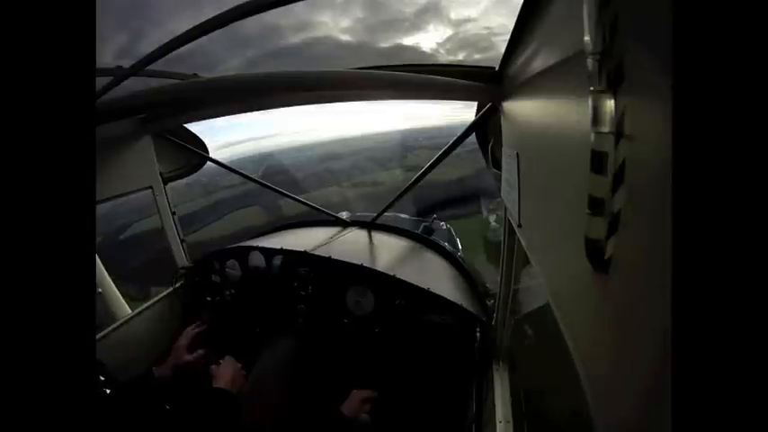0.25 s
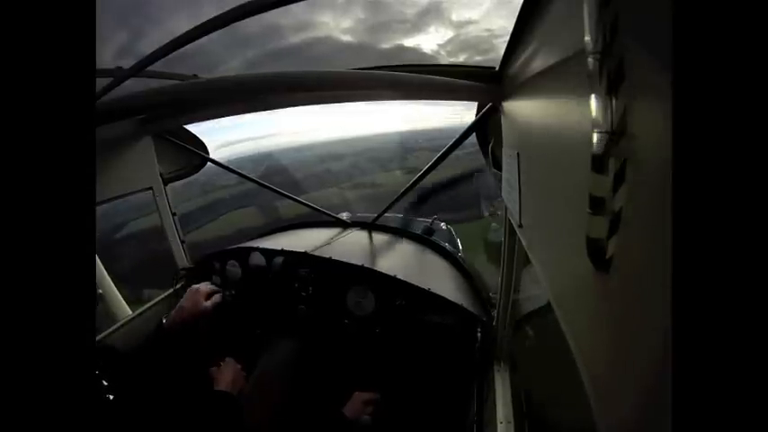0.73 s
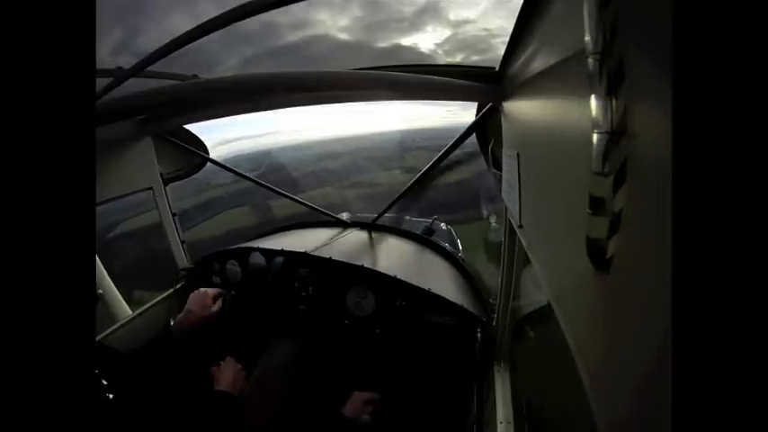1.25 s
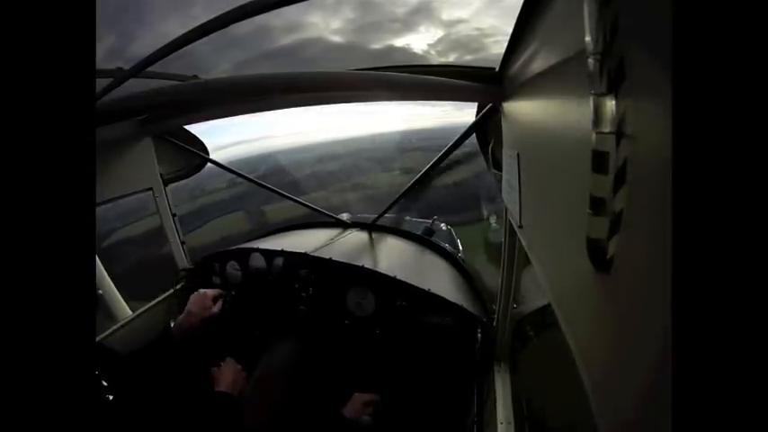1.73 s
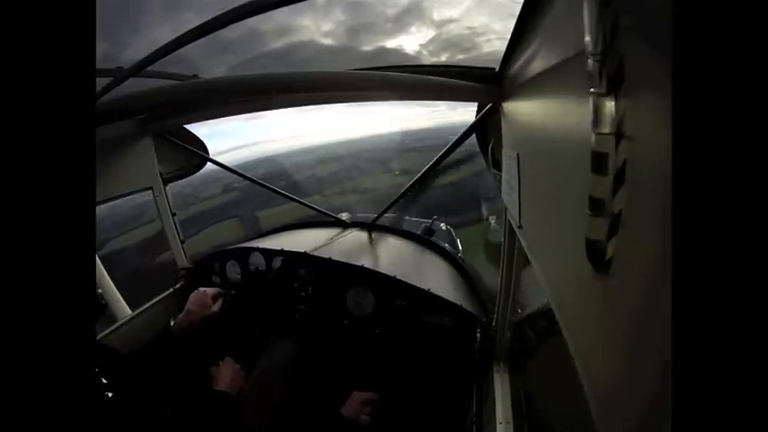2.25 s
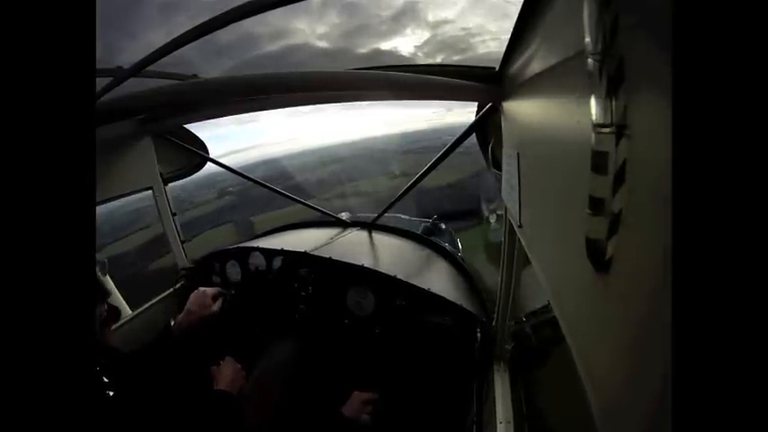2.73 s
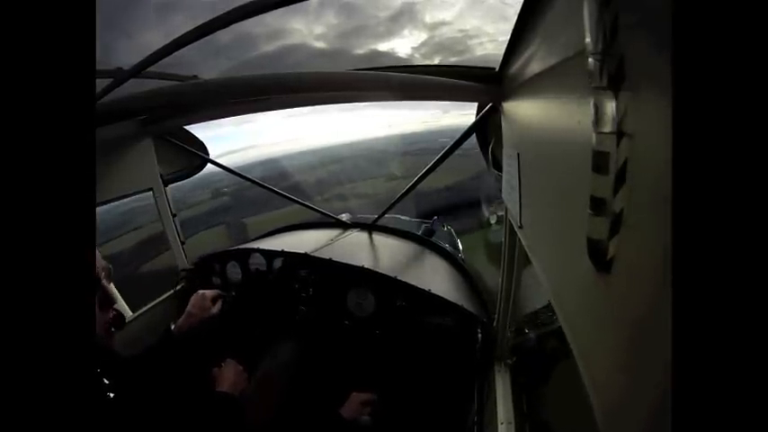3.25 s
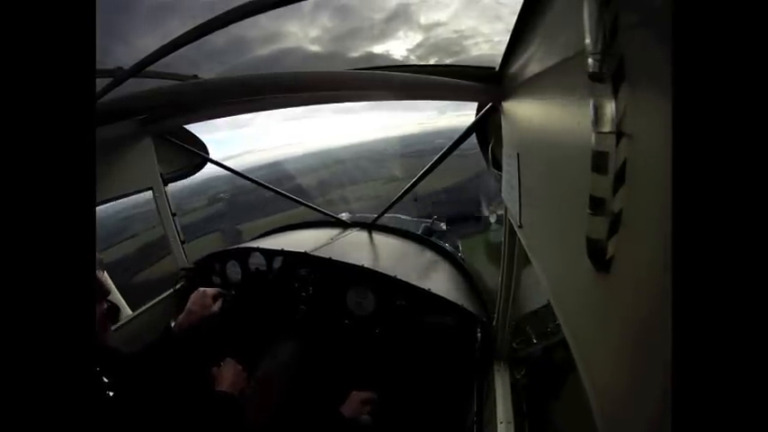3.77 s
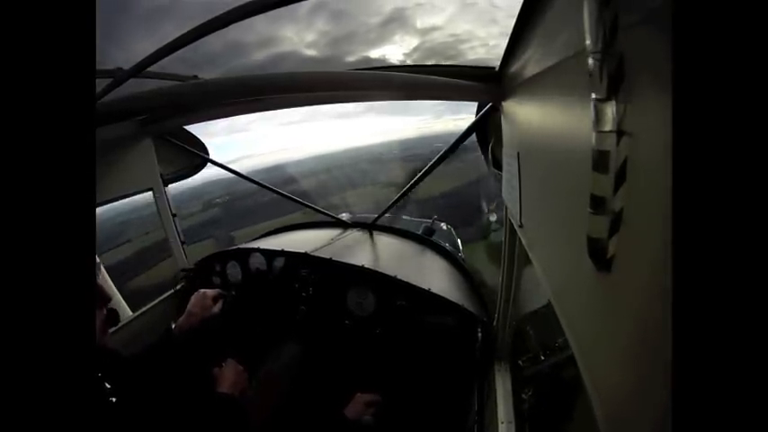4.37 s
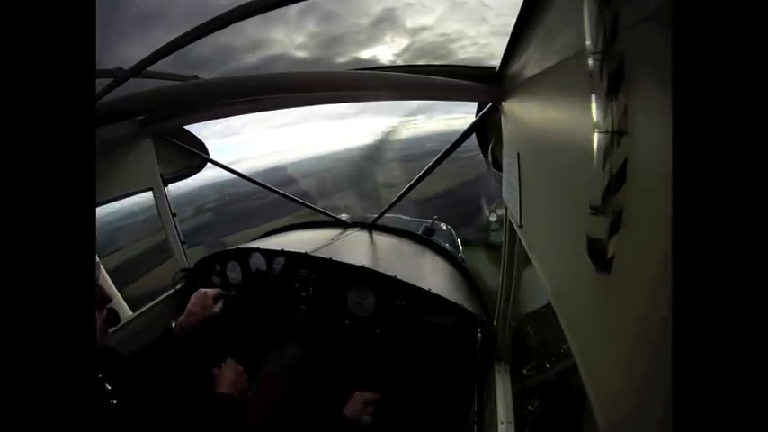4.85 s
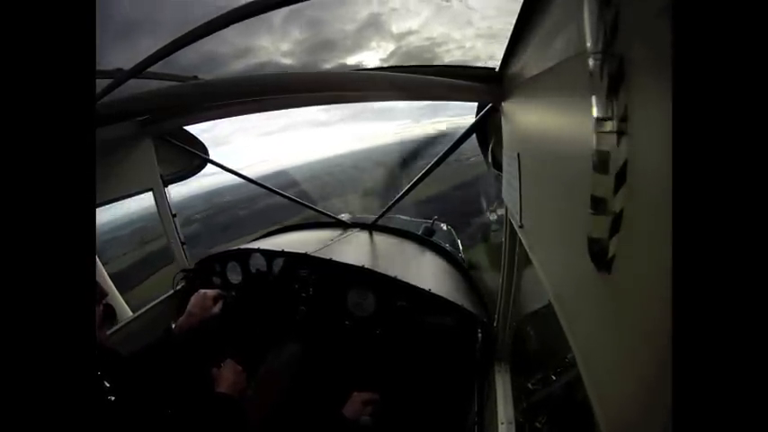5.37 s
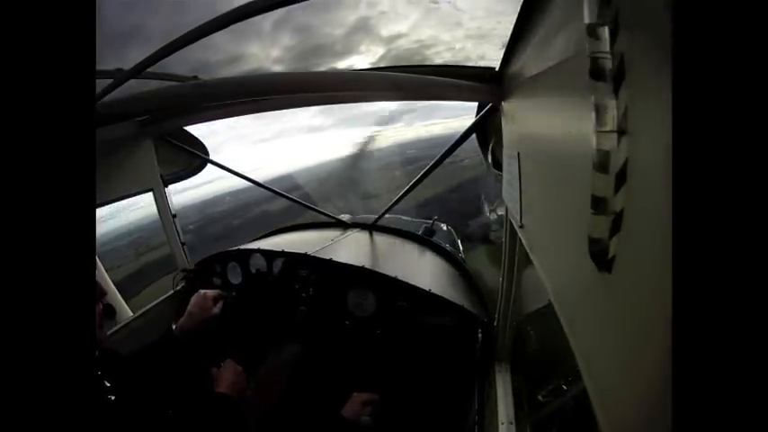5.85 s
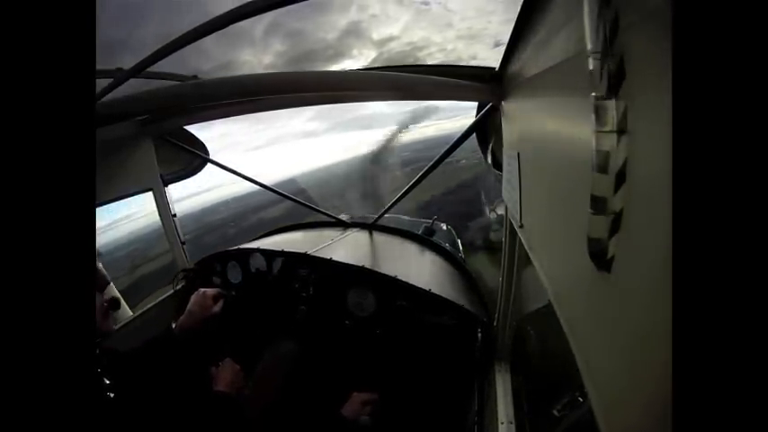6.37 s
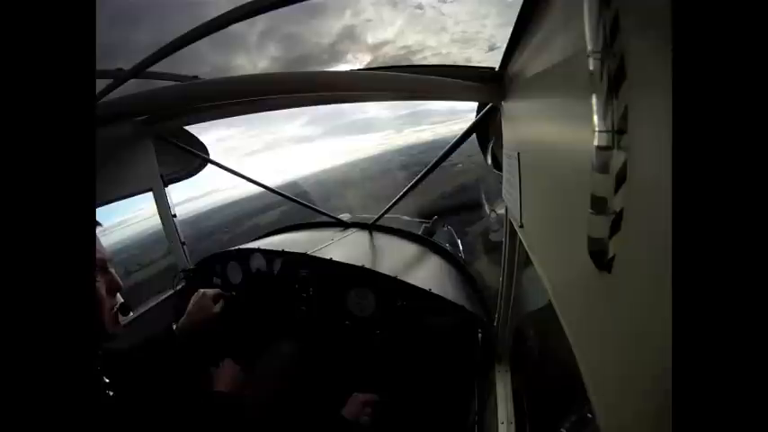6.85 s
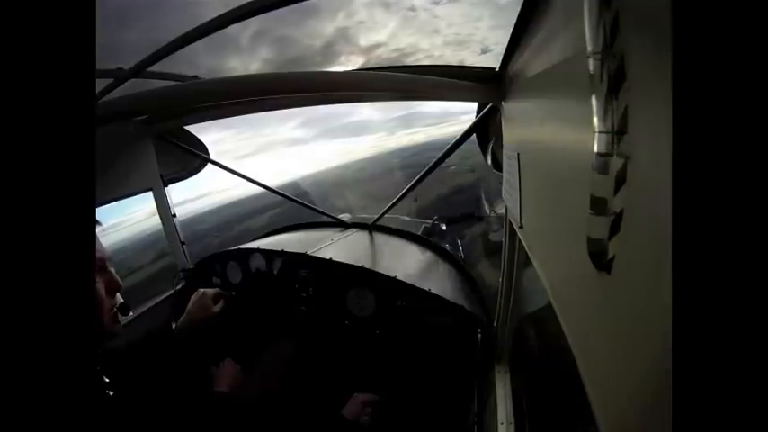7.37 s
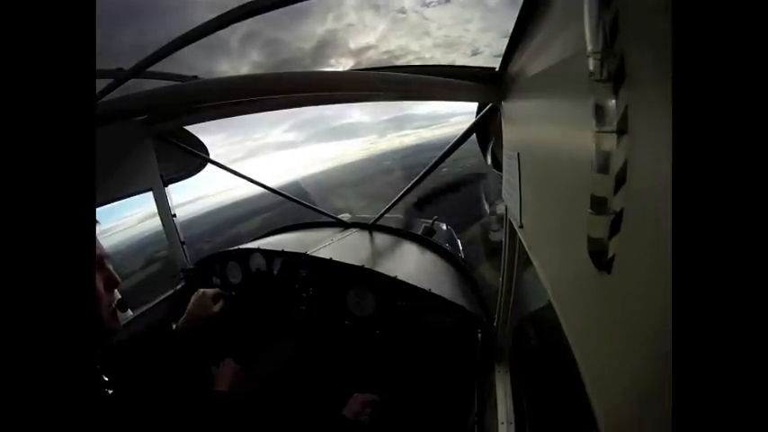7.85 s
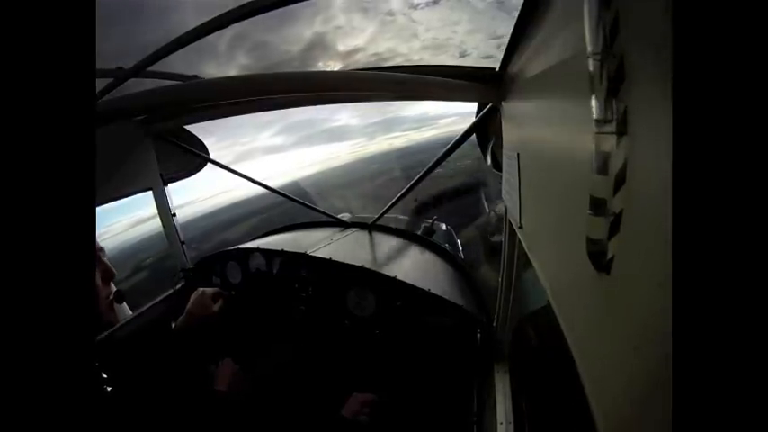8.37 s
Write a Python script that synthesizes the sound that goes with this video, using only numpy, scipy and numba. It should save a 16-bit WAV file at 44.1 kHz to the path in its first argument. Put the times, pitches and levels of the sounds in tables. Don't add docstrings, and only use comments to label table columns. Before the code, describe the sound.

Inside a light aircraft cabin in steady flight, already at full noise from 0 s. A four-cylinder engine and two-blade propeller drone at about 50 pulses per second, deep and slightly lopsided, with quick panel knocks blurring into a buzz. Slipstream buffets low and hisses broadly through the panels, pulsing with the exhaust. A door gap whistles near 2.1 kHz at the start, then hops to two higher notes from about 0.4 to 2 s, and glides gently upward around 2.2 to 2.9 s. Near 3 s the engine speeds up very slightly, its boom swells, and the whistle becomes fainter, flickering on and off among its notes. Boom surges again near 4.7 and 5.8 s, then steadies until the cut at 8.6 s. The small camera's level drifts with brief dips, its compressed sound almost mono, with gritty, mirrored treble.

```python
import sys
import numpy as np
from scipy import signal
from scipy.fft import rfft, irfft, next_fast_len
from scipy.io import wavfile
from scipy.ndimage import uniform_filter1d
from numba import njit

SR = 44100
rng = np.random.default_rng(int(sys.argv[2]) if len(sys.argv) > 2 else 0)


def linear_from_db(decibels):
    return 10 ** (np.asarray(decibels, float) / 20)


def inscribe(sig):
    pcm = np.round(np.clip(np.atleast_2d(sig).T, -1, 1) * 32767)
    wavfile.write(sys.argv[1], SR, pcm.astype(np.int16))


N = 379701
T = np.arange(N) / SR

# frequency in Hz, density in dB per Hz.
RUSH_SPECTRUM = [(180, -38), (300, -4.5), (598, -6.5), (749, -4), (893, -1), (987, -7), (1190, -3),
                 (1420, -7.5), (1990, -4), (2590, -12), (2830, -15), (3680, -17.5), (4070, -21),
                 (5500, -22.5), (6000, -30), (7800, -69), (13200, -120)]
# frequency in Hz, density in dB per Hz.
RUMBLE_SPECTRUM = [(12, -32), (30, -46), (44, -4.5), (62, 3.5), (85, -2), (118, -6.5), (145, -5.5),
                   (180, -4.5), (215, -11.5), (255, -19.5), (300, -21), (450, -39), (600, -60)]
# centre in Hz, width in Hz, peak in dB over the surrounding noise.
PANEL_RESONANCES = [(235, 9.8, 6), (352, 16.5, 3.5), (761, 56, 6), (903.4, 16.7, 8.5), (1183, 64, 2),
                    (1292, 33, 3.5), (1855, 86, 4.5), (2050, 51, 3), (2530, 200, 6.5), (3100, 69, 7.5),
                    (3662, 217, 8.5)]
# lower band edge in Hz, depth in dB, lag in firings,
# levels of the four cylinders in dB.
EXHAUST_PUFFS = [(250, .8, .55, [-.3, -1.2, .3, .8]), (700, 1.3, .45, [0, -.6, 0, .6]),
                 (1450, 1.5, .42, [.2, -.2, -.4, .5]), (2750, 1.6, .45, [-.2, -.3, .1, .7])]
# start in seconds, end in seconds, first Hz, last Hz, level in dB.
LOW_NOTE = [
    (0.03, 0.4, 2127, 2130, -33),
    (1.22, 1.5, 2166, 2169, -37.5),
    (2.2, 2.85, 2157, 2178, -36),
    (2.85, 3.14, 2179, 2188, -41),
    (3.55, 4.24, 2182, 2181, -39),
    (4.85, 5.4, 2180, 2186, -40),
    (6.08, 6.8, 2180, 2187, -39.5),
    (7.15, 8.1, 2182, 2182, -40.5),
    (8.1, 8.7, 2181, 2172, -39),
]
# start in seconds, end in seconds, first Hz, last Hz, level in dB.
MIDDLE_NOTE = [(0.37, 0.58, 2405, 2464, -35.5), (0.58, 0.92, 2462, 2476, -35.5),
               (1.09, 1.18, 2485, 2474, -33), (1.58, 1.77, 2479, 2473, -33),
               (1.85, 2.03, 2463, 2465, -41.5), (2.1, 2.16, 2466, 2465, -38),
               (3.23, 3.45, 2548, 2539, -41.5), (4.52, 4.74, 2513, 2544, -43),
               (5.65, 5.84, 2544, 2536, -37), (5.84, 5.93, 2535, 2528, -44), (6.98, 7.08, 2526, 2537, -46)]
# start in seconds, end in seconds, first Hz, last Hz, level in dB.
HIGH_NOTE = [
    (0.47, 0.8, 2600, 2583, -46),
    (0.9, 0.99, 2572, 2576, -39),
    (0.99, 1.08, 2578, 2603, -34),
    (1.53, 1.61, 2598, 2602, -41),
    (1.8, 1.96, 2592, 2584, -45),
    (3.2, 3.43, 2671, 2659, -41),
    (4.42, 4.49, 2640, 2635, -39),
    (4.67, 4.8, 2654, 2638, -41.5),
    (5.65, 5.71, 2673, 2670, -44),
    (7.02, 7.14, 2660, 2620, -44.5),
]
# frequency in Hz, 60 dB decay time in seconds,
# level in dB over the air noise, lag in firings, levels of the four cylinders in dB.
STRUCK_PANELS = [(763, .06, -13.5, .2, [-14, -20, 0, -10]), (1172, .035, -14.5, .55, [-8, -8, -10, 0]),
                 (2030, .03, -15.5, .3, [0, -8, -16, -3]), (3110, .035, -21, .35, [-7, -7, 0, -2])]
# multiple of the firing rate, level in dB over the air noise.
WEAK_ORDERS = [(.5, -16), (.75, -10.5), (1.5, -12), (1.75, -8), (2.25, -11), (2.75, -15), (3, -5.8),
               (3.5, -16), (4, -10.5), (4.5, -16), (4.75, -23), (5.5, -27), (6, -32)]
# time in seconds, firing rate in Hz.
FIRING_RATE = [(0, 49.7), (.45, 49.72), (1, 50.08), (1.7, 49.85), (2.1, 49.9), (3.5, 50.67), (4.25, 50.88),
               (4.8, 50.74), (5.6, 50.9), (6.3, 50.75), (8.61, 50.73)]
# time in seconds, level in dB.
CABIN_BOOM = [(0, -20.9), (.4, -21.6), (.8, -30), (1, -20), (1.25, -25), (1.75, -22.5), (2.22, -27),
              (2.5, -21), (2.8, -20.5), (3.25, -14.5), (4.25, -19), (4.65, -15.5), (5, -17.7), (5.75, -15),
              (6.25, -17.5), (7, -18), (8.4, -19), (8.61, -19.5)]
# time in seconds, gain in dB.
SLOW_GAIN = [(0, -25.5), (.5, -23.5), (1.45, -24), (1.9, -26.5), (2.15, -24), (2.35, -26.5), (2.65, -24),
             (2.88, -26), (2.97, -28), (3.42, -30), (3.8, -27.5), (5.2, -27), (5.75, -29), (5.9, -31),
             (6.3, -28.5), (7.75, -27), (8.15, -30), (8.6, -27)]
# time in seconds, depth in dB.
GAIN_DUCKS = [(.11, 0.5), (.59, 3.5), (.74, 3.5), (1.28, 2), (1.51, 3.5), (2.02, 4), (2.42, 3), (2.74, 3),
              (3.38, 3), (3.97, 4), (4.3, 3), (4.5, 2), (4.92, 4), (5.4, 0.5), (6.58, 2.5), (6.95, 5.5),
              (7.37, 2.5), (7.57, 3), (7.9, 1)]
# frequency in Hz, density in dB per Hz.
SIDE_SPECTRUM = [(30, 0), (100, -9), (330, -6), (700, -21.5), (2500, -35.5), (7500, -41.0)]


def curves(table):
    seconds, *columns = np.transpose(table)
    return [np.interp(T, seconds, column) for column in columns]


def walk(rate):
    hold = int(SR / rate)
    steps = np.repeat(rng.standard_normal(N // 100)[:N // hold + 1], hold)
    return 1.407 * uniform_filter1d(uniform_filter1d(steps, hold), hold)[:N]


def coloured(spectrum, edges_hz):
    size = next_fast_len(N)
    hz = np.arange(1, size // 2 + 2) * SR / size
    table_hz, table_db = np.transpose(spectrum)
    gain = linear_from_db(np.interp(np.log(hz), np.log(table_hz), table_db, left=-90, right=-90))
    for centre, width, peak_db in PANEL_RESONANCES:
        gain = gain * (1 + (linear_from_db(peak_db) - 1) / (1 + (2 * (hz - centre) / width) ** 2))
    bins = rfft(rng.standard_normal(size)) * gain / np.sqrt(np.mean(gain ** 2))
    return [irfft(bins * (hz >= lo) * (hz < hi), size)[:N] for lo, hi in zip(edges_hz, edges_hz[1:])]


def rush(firings):
    bands = coloured(RUSH_SPECTRUM, [row[0] for row in EXHAUST_PUFFS] + [SR / 2])
    firing_db = 1.14 * rng.standard_normal(N // 500)
    gust_db = .4 * walk(10)
    out = 0
    for band, (_, depth_db, lag, cylinder_db) in zip(bands, EXHAUST_PUFFS):
        phase = firings + 1 - lag
        puff_db = depth_db * (np.exp(1.2 * (np.cos(2 * np.pi * phase) - 1)) - .4)
        puff_db += np.interp(phase % 4, np.arange(5), cylinder_db + cylinder_db[:1])
        puff_db += np.interp(phase, np.arange(len(firing_db)), firing_db)
        out = out + band * linear_from_db(puff_db + gust_db + 0.14 * walk(5.1))
    return out


def rumble(firings):
    bands = coloured(RUMBLE_SPECTRUM, [10, 60, 110, 190, 500])
    throb_db = 1.5 * np.cos(2 * np.pi * (firings - .45))
    return sum(band * linear_from_db(1.4 * walk(4) + throb_db * (k > 1)) for k, band in enumerate(bands))


def whistle(notes):
    attack_s, release_s = .05, .1
    start, end, first_hz, last_hz, level_db = np.transpose(notes)
    flutter_hz = 5 * walk(40)
    flutter_db = 1.6 * walk(50) + .6 * walk(9)
    hz = np.interp(T, np.ravel([start, end], "F"), np.ravel([first_hz, last_hz], "F"))
    envelope = 0
    for a, b, db in zip(start, end, level_db):
        ramps = np.minimum((T - a) / attack_s, (b - T) / release_s)
        envelope = envelope + linear_from_db(db) * np.clip(ramps + .5, 0, 1)
    tone = np.sin(2 * np.pi * np.cumsum(hz + flutter_hz) / SR)
    return np.sqrt(2) * envelope * linear_from_db(flutter_db) * tone


def knocks(firings):
    scatter_db, jitter = 2.5, .02
    count = np.arange(int(firings[-1]) - 1)
    out = 0
    for hz, t60, db, lag, cylinder_db in STRUCK_PANELS:
        late, hard = rng.standard_normal((len(count), 2)).T
        blows = np.zeros(N)
        at = np.searchsorted(firings, count + lag + jitter * late)
        blows[at] = linear_from_db(np.take(cylinder_db, count % 4) + scatter_db * hard)
        pole = np.exp(2j * np.pi * hz / SR - np.log(1000) / (t60 * SR))
        onset = signal.lfilter([1], [1, -pole * abs(pole) ** 2], blows)
        ring = signal.lfilter([1], [1, -pole], onset).imag
        out = out + linear_from_db(db) * ring / ring.std()
    return out


def order(multiple, firings, db):
    quarters = round(4 * multiple)
    lag = rng.random() * (quarters % 4 > 0)
    waver = 0.021 * multiple * walk(2.916)
    return -np.sqrt(2) * linear_from_db(db) * np.sin(2 * np.pi * (quarters / 4 * firings + lag + waver))


def engine(firings, boom_db, lope_db, octave_db, air_db):
    boom_db = boom_db + 0.9 + 1.5 * walk(4.5)
    out = order(1, firings, boom_db) + order(5 / 4, firings, lope_db) + order(2, firings, octave_db)
    for multiple, db in WEAK_ORDERS:
        out = out + order(multiple, firings, air_db + db + 2.9 * walk(3))
    return out


def camera_gain():
    attack_s, release_s = .012, .07
    slow_db = curves(SLOW_GAIN)[0]
    ducks_db = 0
    for seconds, depth_db in GAIN_DUCKS:
        since = T - seconds + attack_s
        rise = np.clip(1 + since / attack_s, 0, 1)
        ducks_db = ducks_db + depth_db * rise * np.exp(-np.maximum(since, 0) / release_s)
    return slow_db, slow_db - ducks_db + .5 * walk(14)


def tracking(level_db, slope, swell_db, slow_db):
    return level_db + slope * (slow_db + 27.5) + swell_db * walk(2.96)


def scene():
    hz, boom_db = curves(FIRING_RATE)[0], curves(CABIN_BOOM)[0]
    firings = -.85 + np.cumsum(hz) / SR
    slow_db, air_db = camera_gain()
    lope_db = tracking(-30.5, 1.9, 1.2, slow_db)
    octave_db = tracking(-28.7, 1.3, 2.6, slow_db)
    mono = linear_from_db(air_db - 1.14) * rush(firings)
    mono += linear_from_db(air_db + 5.5) * rumble(firings)
    mono += linear_from_db(air_db - slow_db + 1.74) * sum(whistle(notes) for notes in (LOW_NOTE, MIDDLE_NOTE, HIGH_NOTE))
    mono += linear_from_db(air_db) * knocks(firings)
    mono += engine(firings, boom_db, lope_db, octave_db, uniform_filter1d(air_db, SR // 4))
    return np.array([mono, mono])


@njit
def follower(x, attack, release):
    out, level = np.empty(len(x)), .3
    for i in range(len(x)):
        level += (abs(x[i]) - level) * (attack if abs(x[i]) > level else release)
        out[i] = level
    return out


def band_limit(x):
    return signal.sosfilt(signal.butter(12, 15720, fs=SR, output="sos"), x)


def record(dry):
    peak = follower(dry[0], 1 / (.003 * SR), 1 / (.12 * SR))
    ducked = dry[0] * (.29 / peak) ** .3
    bass_cut = signal.butter(2, 24, "high", fs=SR, output="sos")
    ducked = signal.sosfiltfilt(bass_cut, ducked)
    slow = signal.resample_poly(ducked, 40, 147)
    held = signal.resample_poly(np.repeat(slow, 4), 147, 160)[:N]
    treble_cut = signal.ellip(10, .2, 80, 15290, fs=SR, output="sos")
    held = signal.sosfilt(treble_cut, np.pad(held, (0, N - len(held))))
    low, high = coloured(SIDE_SPECTRUM, [10, 900, 8000])
    side = linear_from_db(-58.5) * (low * linear_from_db(4.5 * walk(30)) + linear_from_db(-1.5) * high * linear_from_db(7 * walk(25)))
    return band_limit(np.array([held + side, held - side]))


dry = scene()
out = record(dry)
inscribe(out)
```